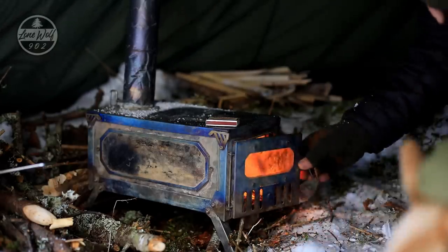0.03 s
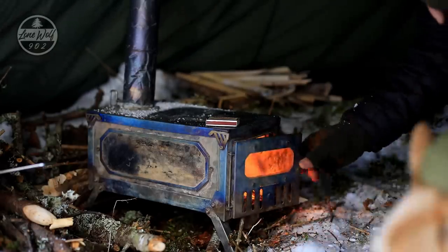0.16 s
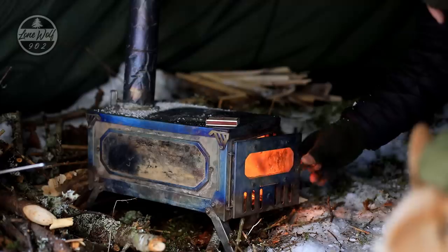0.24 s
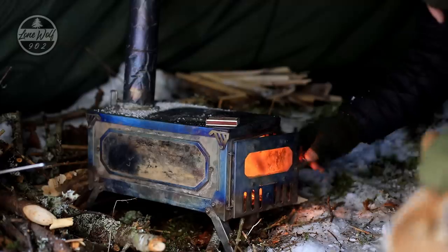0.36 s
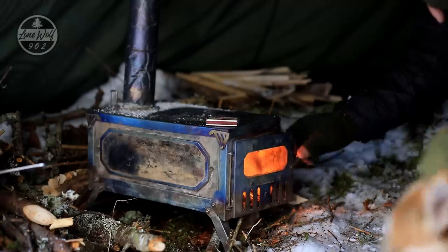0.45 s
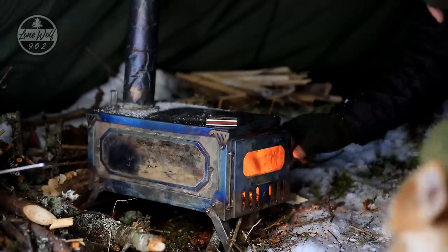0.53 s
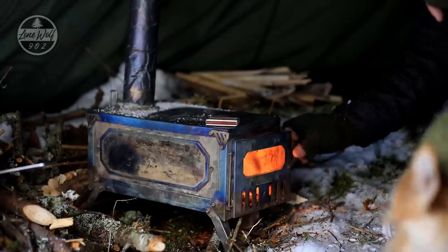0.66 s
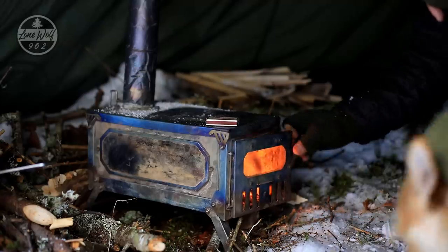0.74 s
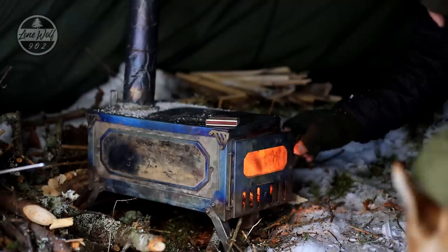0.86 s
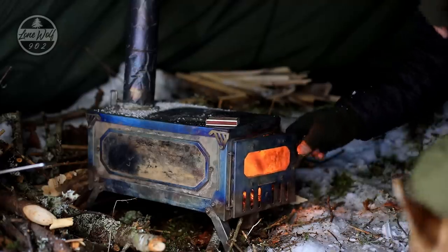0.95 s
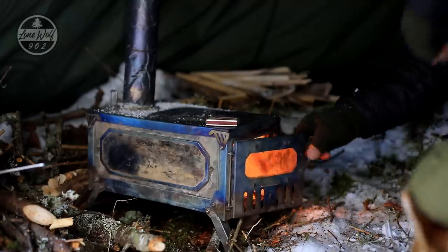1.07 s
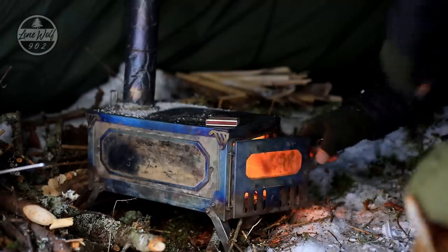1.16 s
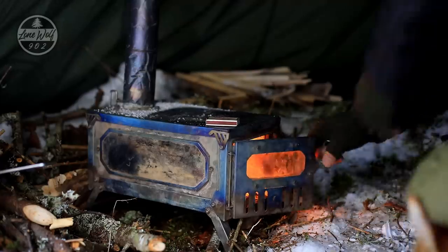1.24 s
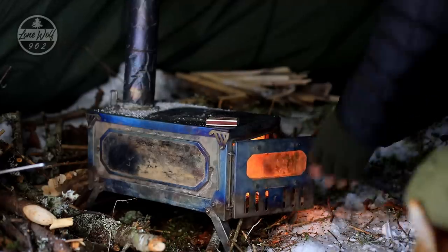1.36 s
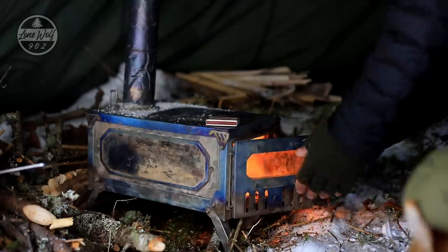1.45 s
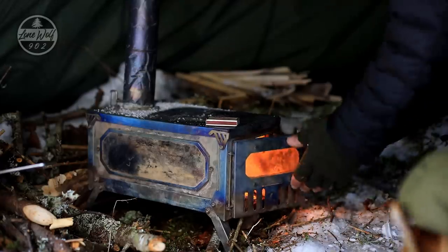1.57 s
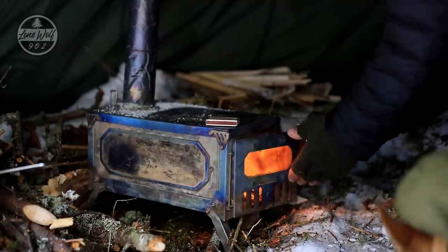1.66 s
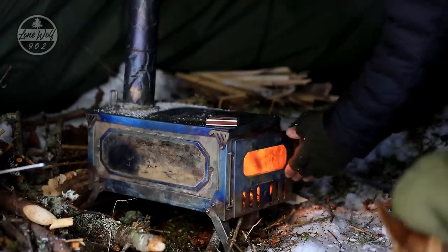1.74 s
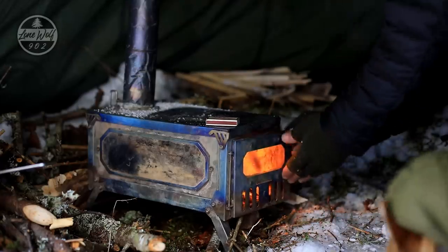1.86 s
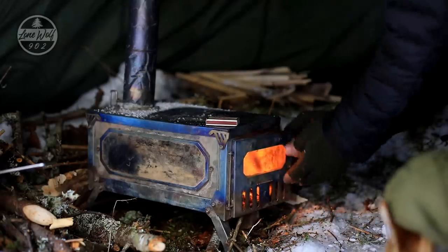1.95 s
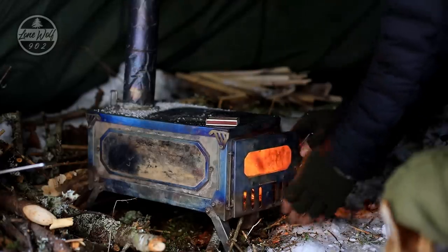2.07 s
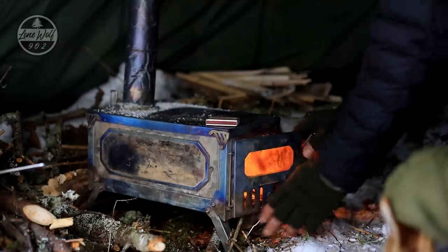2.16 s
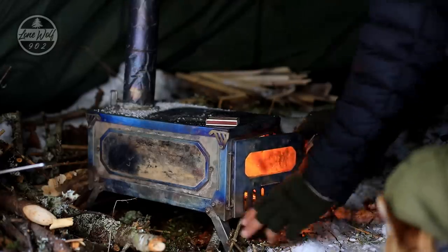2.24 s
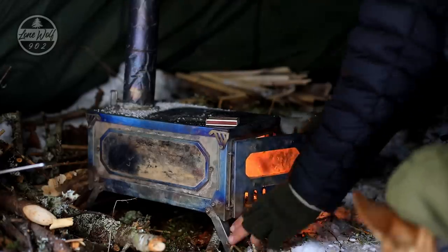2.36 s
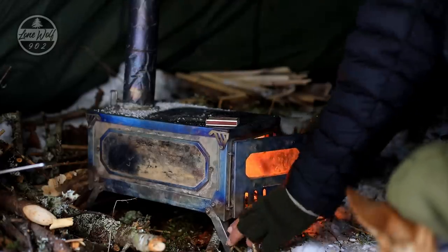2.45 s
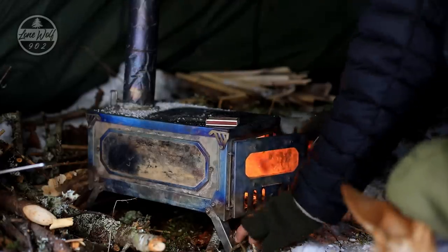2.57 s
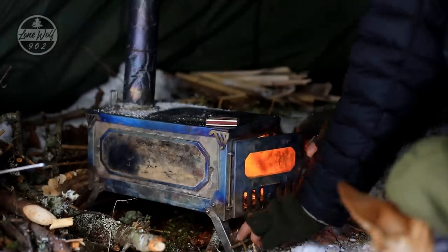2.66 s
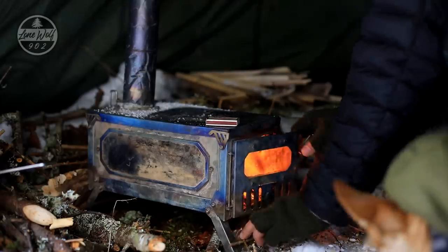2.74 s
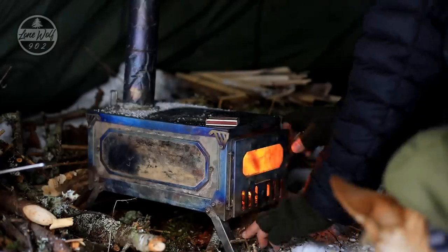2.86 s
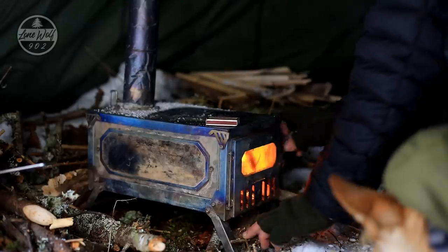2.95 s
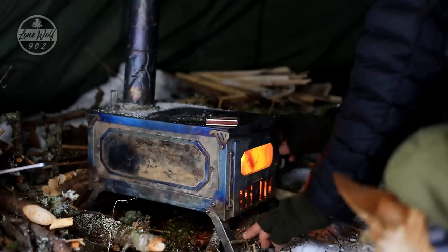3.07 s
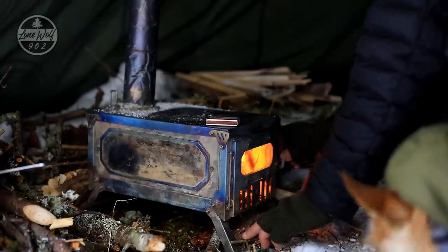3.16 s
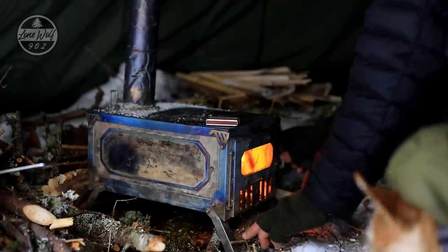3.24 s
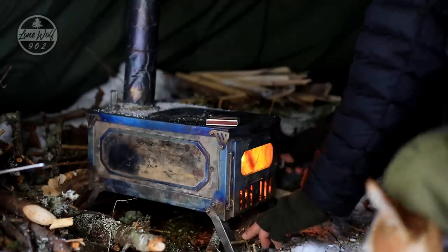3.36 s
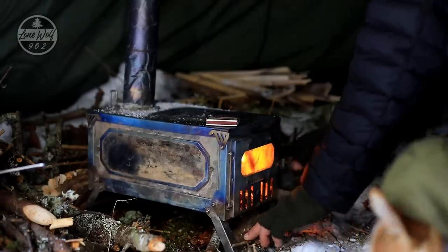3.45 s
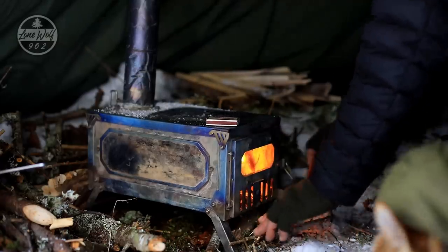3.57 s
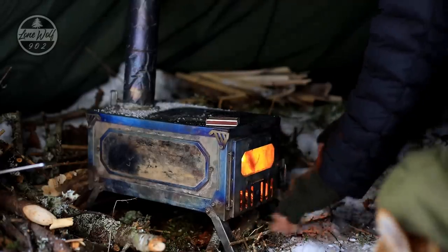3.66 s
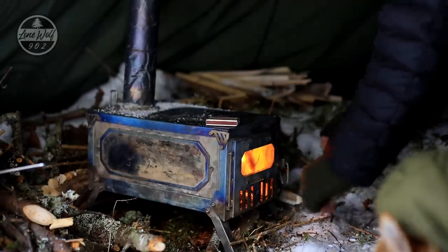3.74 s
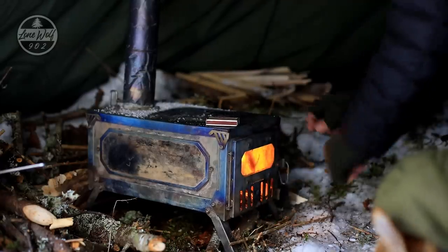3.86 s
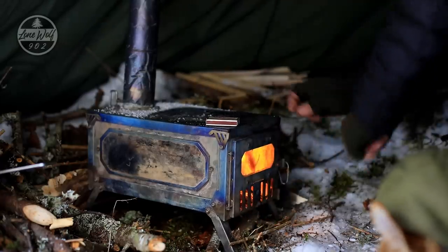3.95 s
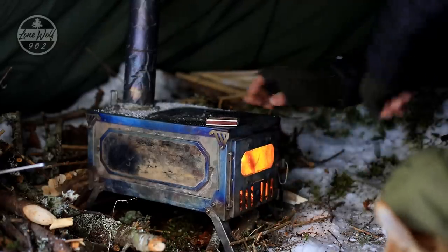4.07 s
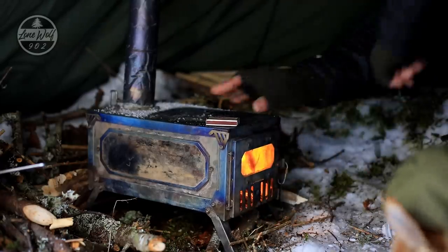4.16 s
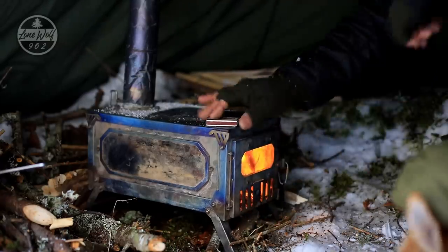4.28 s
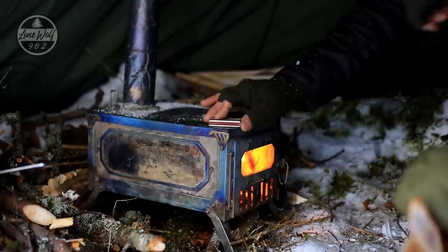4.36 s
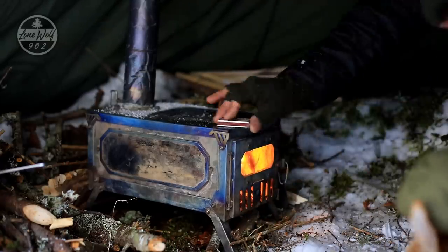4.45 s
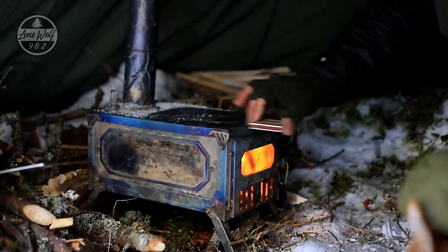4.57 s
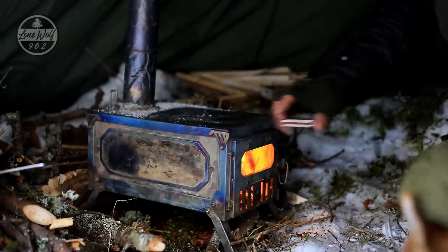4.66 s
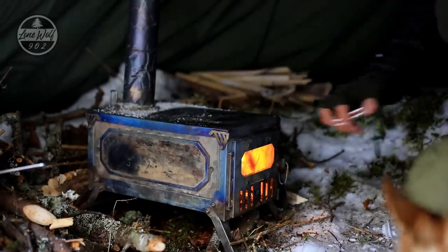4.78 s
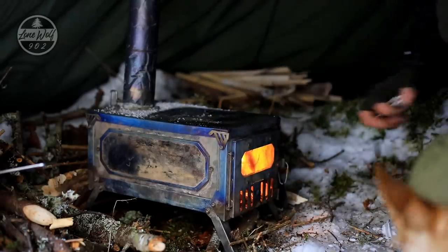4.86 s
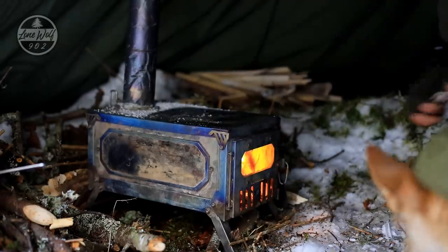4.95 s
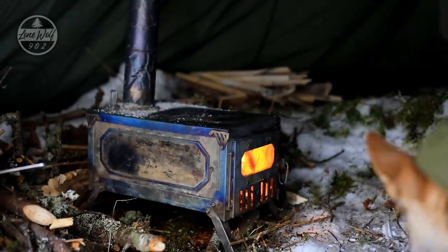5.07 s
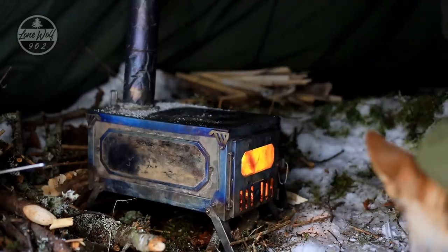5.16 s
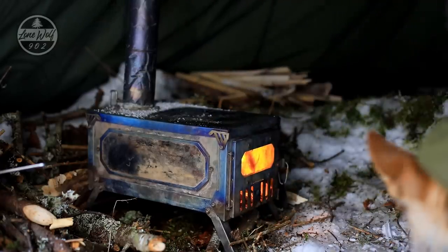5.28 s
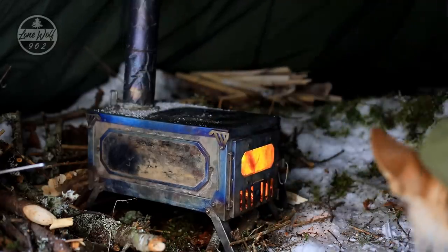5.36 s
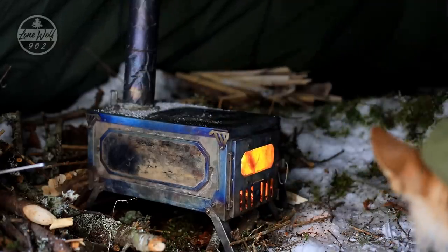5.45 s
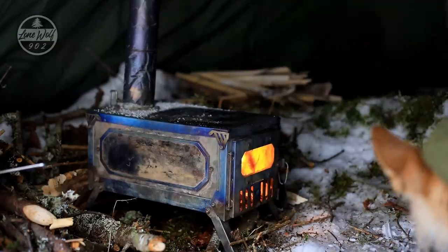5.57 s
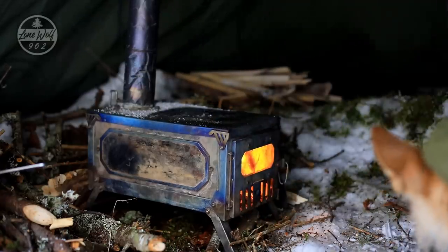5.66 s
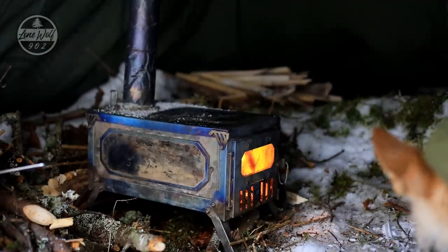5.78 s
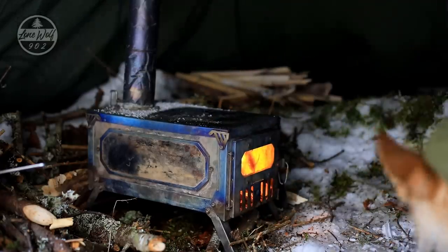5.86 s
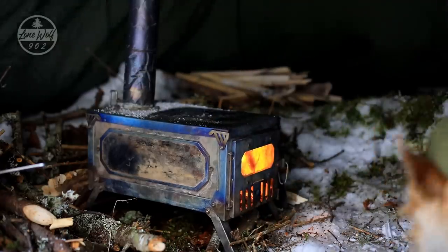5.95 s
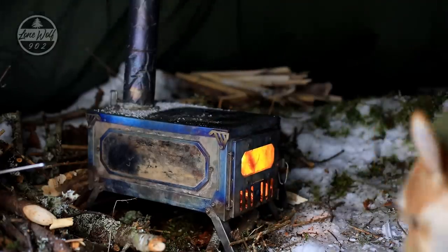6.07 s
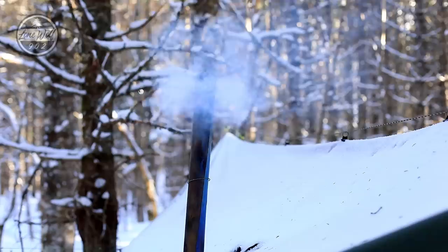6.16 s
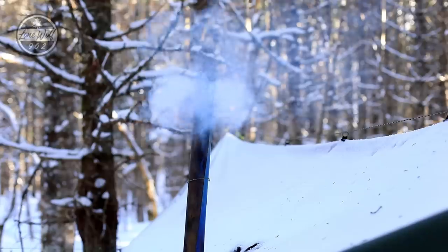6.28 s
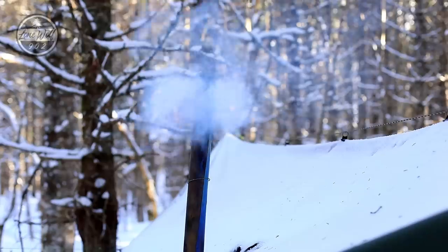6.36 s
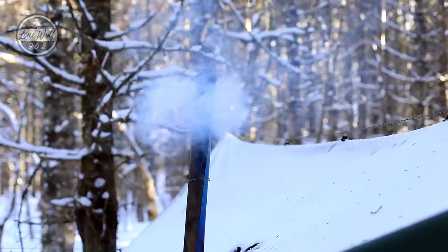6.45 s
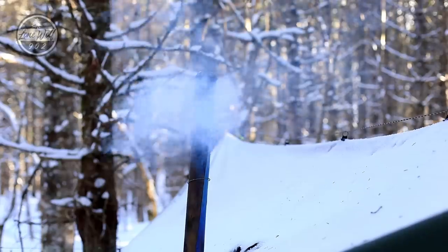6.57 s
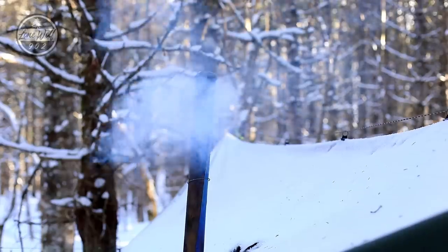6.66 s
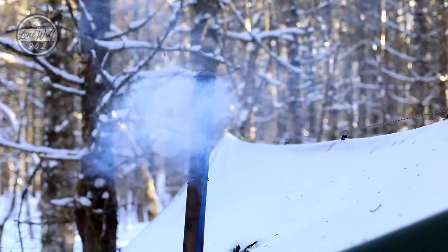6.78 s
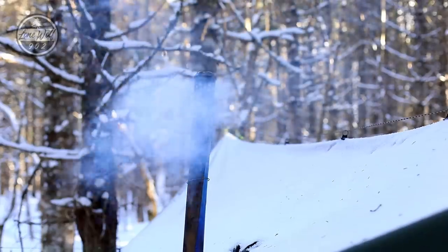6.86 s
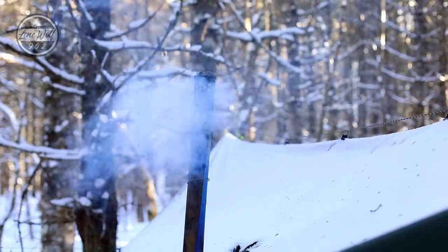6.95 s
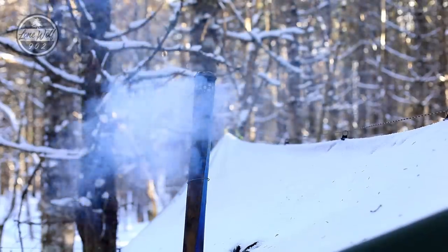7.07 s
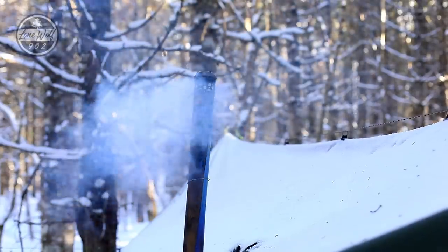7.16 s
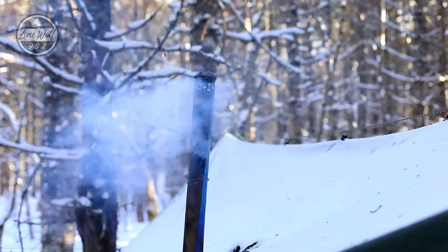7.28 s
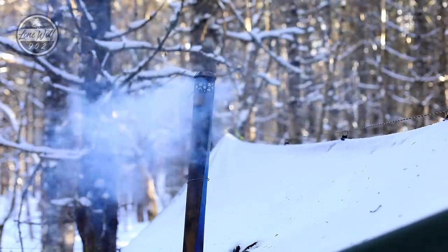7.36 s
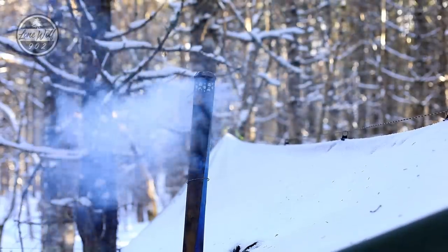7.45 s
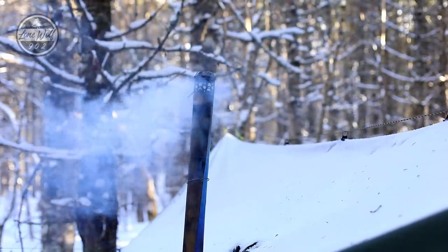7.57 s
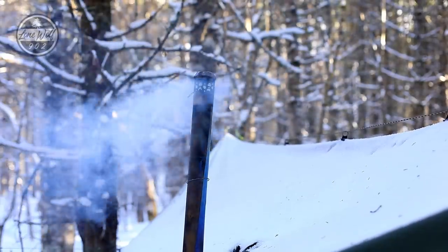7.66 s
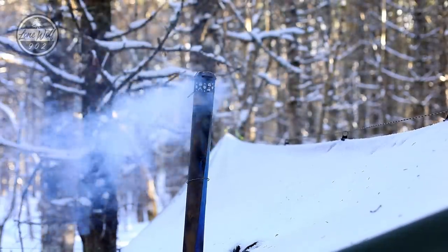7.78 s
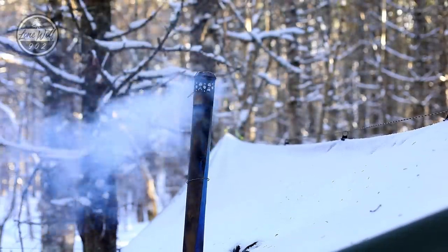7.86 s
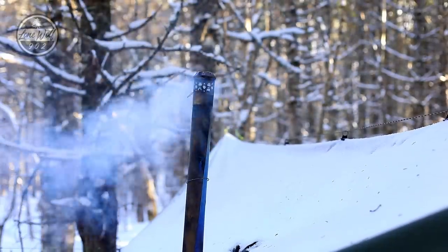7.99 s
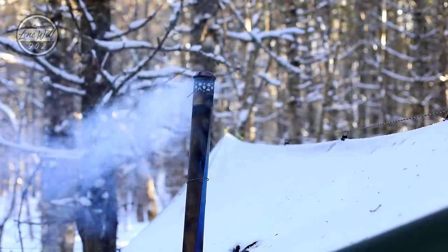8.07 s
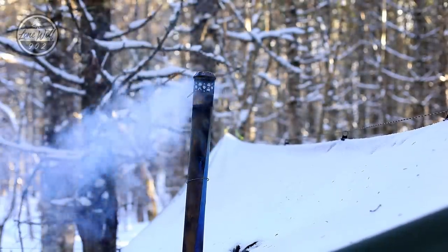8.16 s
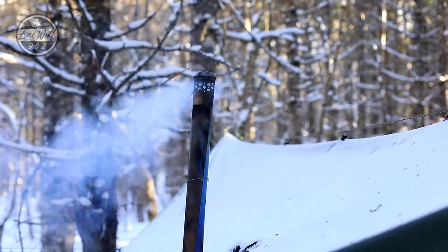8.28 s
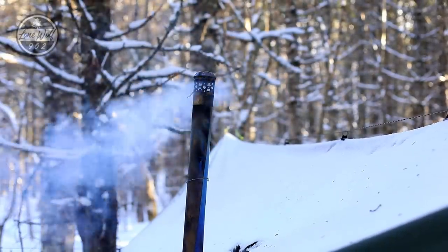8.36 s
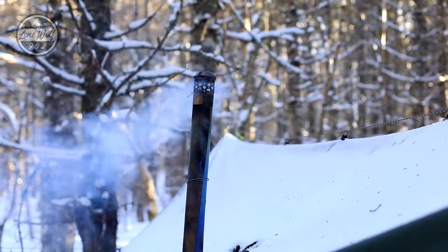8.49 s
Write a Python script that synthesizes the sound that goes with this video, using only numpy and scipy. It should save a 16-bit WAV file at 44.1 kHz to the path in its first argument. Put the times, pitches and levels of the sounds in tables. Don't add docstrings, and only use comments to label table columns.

```python
import sys
import numpy as np
from scipy import signal
from scipy.fft import rfft, irfft
from scipy.io import wavfile
from scipy.ndimage import uniform_filter1d

SR = 44100
rng = np.random.default_rng(int(sys.argv[2]) if len(sys.argv) > 2 else 0)


def wav_out(sig):
    wavfile.write(sys.argv[1], SR, np.round(np.clip(np.atleast_2d(sig).T, -1, 1) * 32767).astype(np.int16))


def invert_db(x):
    u = np.asarray(x, float) / 20
    return 10 ** u


N = 375776

# frequency in Hz, level in dB per Hz.
ROAR_SPECTRUM = [(60, -44), (100, -23), (140, 6), (190, 0), (430, -1), (600, -1), (1000, -1), (1300, -0.5),
                 (1500, 1), (1750, -2.5), (2100, -5.5), (3200, -11.5), (6000, -37)]
# frequency in Hz, level in dB per Hz.
LEAF_SPECTRUM = [(1060, -13), (1800, -4), (2110, -4), (2210, -3), (3530, -3), (4240, -10), (11000, -31.5),
                 (14300, -62), (22000, -120)]
# frequency in Hz, level in dB per Hz.
RUMBLE_SPECTRUM = [(12, -34), (20, -3.5), (49, 5), (130, -1), (148, -15), (194, -14), (200, -26),
                   (260, -45), (440, -120)]
# frequency in Hz, level in dB per Hz.
DRAUGHT_SPECTRUM = [(2500, -38), (3300, -3), (3900, -0.5), (4500, -6.5), (5200, -11.5), (6500, -37)]
# time in seconds, gust strength in dB.
GUSTS = [(0, 4.5), (.66, 0), (1.21, 2), (1.54, -2), (2.28, -1.5), (3.4, -2), (3.89, 1.5), (4.32, 0),
         (4.86, 1), (5.58, 7.5), (6.0, 6.5), (6.38, 6.5), (6.71, 10), (7.31, 5.5), (7.92, 3.5), (8.52, 4)]
ROAR_DB, ROAR_SHARE, LEAVES_DB, LEAVES_SHARE = -40.5, 0.4, -49.5, 0.99
RUMBLE_DB, RUMBLE_SHARE, DRAUGHT_DB, DRAUGHT_SHARE = -49, 0.32, -52.5, 0.064
OUTSIDE_S, STEP_S, OUTSIDE_DB = 6.05, 0.052, -9.5
# start, attack, hold, release in seconds, gain in dB.
PULL = (4.54, 1.13, 0.39, 0.59, 10.2)

# frequency in Hz, level in dB per Hz.
HISS_SPECTRUM = [(3240, -30), (5500, -3), (7920, -7), (15100, -10.5), (16100, -14), (16400, -31)]
HISS_DB = -61.5

LATCH_HZ = [3623, 7639, 7736, 10433, 13604, 14795, 15155]
# level in dB, free t60 in seconds, touched t60 in seconds.
LATCH_MODES = [(0, 0.19, 0.019), (-6, .25, .07), (-3, 0.34, 0.091), (-1.5, 0.22, 0.062), (0, .1, .05),
               (-4, .1, .05), (-1, .06, .04)]
# dB of the 3.6 kHz, 7.7 kHz, 10 kHz and top modes.
FLAT = (1.5, -32, -32, -35)
EDGE = (0, -31, -11, -31)
FULL = (0.5, -20.5, -17.5, -27)
SIDE_ON = (-0.5, -26, -29, -24)
TIP = (-2, -25, 0, -4)
CATCH = (-2, -10, -13, -30)
# time in seconds, blow in dB, seconds until touched.
BAR_HITS = [
    (FLAT, [(.016, -38, .014), (.284, -44, .025), (.075, -44, .03), (.262, -48, .04), (3.6405, -29.5, 0.013), (3.659, -45, 0.02), (3.815, -35, 0.01), (3.827, -27, .005), (3.901, -36, .018)]),
    (EDGE, [(.234, -41, .01), (.295, -43, .008), (3.515, -40, .06)]),
    (FULL, [(0, -26.5, 0.013), (3.8323, -14.5, .033)]),
    (SIDE_ON, [(3.779, -14.5, 0.032), (3.8452, -18.5, 0.021)]),
    (TIP, [(3.646, -51, .012), (3.667, -38.5, 0.022)]),
    (CATCH, [(.545, -48, .015), (3.868, -33, 0.03)]),
]
HANDLE_HZ = [1663, 2080, 2234, 2595, 3278, 4371, 4851, 4908, 5534, 6742, 10977, 11730, 12400]
# level in dB, free t60 in seconds, touched t60 in seconds.
HANDLE_MODES = [(-7, 0.18, .05), (-14, 0.23, 0.074), (-3, 0.092, 0.044), (-3, .1, .05), (-8, .1, .05),
                (-14, .1, .05), (-5, 0.19, .06), (-8, .15, .06), (-9, 0.17, .08), (2, 0.98, .04),
                (-3, 0.29, .06), (-11, .3, .06), (-3, .12, .06)]
# dB of the modes under 4 kHz, under 6 kHz, at 6.7 kHz and above.
SWUNG = (0, -10, -32, -8)
JOLTED = (0, 3, -26, -20)
NUDGED = (-1, -16, -25, -30)
LOOP = (-20, -20, -1, -16)
RIM = (-6, 2, -8, -2)
# time in seconds, blow in dB, seconds until touched.
HANDLE_HITS = [
    (SWUNG, [(3.64, -53, .008), (3.7785, -25.5, .065)]),
    (JOLTED, [(3.8333, -32.5, 0.051)]),
    (NUDGED, [(2.893, -47, .015), (3.85, -39, 0.018), (3.901, -37, .02)]),
    (LOOP, [(.018, -56, .01), (.075, -61, .03), (3.6755, -48, 0.018), (3.78, -39.5, 0.048), (3.8333, -41, .024)]),
    (RIM, [(0, -48, .015), (.27, -62, .02)]),
]

# time in seconds,
# frequency in Hz, level in dB, t60 in seconds.
PINGS = [(.495, 1050, -35, .05), (.5075, 1790, -23, .04), (0.5114, 1930, -22, .05),
         (0.5135, 3360, -23, 0.046), (.5165, 4100, -26, .04), (.524, 3790, -29, .05),
         (.5245, 1410, -28, 0.042), (.535, 3600, -32, .04), (1.024, 2700, -32, .02),
         (1.024, 1900, -31, .02), (1.2875, 2600, -20, .003), (.3615, 8700, -38, .02),
         (.362, 2600, -33, .03), (2.591, 3420, -32, .03), (2.595, 3180, -28, .02), (2.676, 6800, -47, .015),
         (2.8915, 3270, -29, .02), (3.088, 7600, -19, .02), (3.088, 3870, -15, .012),
         (3.0892, 3210, -14, 0.024), (3.092, 524, -32, .1), (3.11, 560, -33, 0.066),
         (3.0915, 1805, -28, 0.079), (3.094, 3770, -25, 0.062), (3.095, 4160, -26, .05),
         (3.096, 894, -32, 0.088), (3.1, 2640, -30, .09), (3.105, 3350, -33, 0.073),
         (3.111, 2280, -34, 0.087), (3.2538, 3620, -22, .012), (3.2553, 2800, -21, .012),
         (3.2692, 4130, -19.5, .012), (3.27, 9900, -44, 0.022), (3.2722, 3400, -32, .04),
         (3.5148, 3940, -30, 0.032), (3.515, 10200, -33, .03), (3.516, 3100, -36, .04),
         (3.5585, 4300, -31, .015), (3.561, 3570, -34, .05), (3.641, 1520, -18, .01),
         (3.641, 3500, -27, .012), (3.6455, 1550, -25, .01), (3.6755, 3500, -29, .02),
         (4.9042, 1700, -22, .012), (4.9085, 5300, -39, .05), (4.9135, 1800, -20, .012),
         (4.9345, 3620, -25, .025), (5.124, 513, -32, 0.065),
         (.0425, 8600, -48, .012), (.0425, 10300, -51, .012), (.361, 9850, -40, .02),
           (.515, 6400, -30, .025), (.5365, 3300, -30, .02), (3.0882, 4900, -21, .025),
           (3.0882, 5600, -32, .025), (3.0884, 6500, -24, .025), (3.0905, 2675, -24, .04),
           (3.106, 3380, -27, 0.027), (3.7788, 5600, -25, .03), (3.7792, 4900, -26, .03),
           (3.781, 1670, -28.5, .05), (3.8318, 5000, -24, .02), (3.834, 2190, -26, .03),
           (3.783, 5300, -30, .03), (3.836, 4600, -32, .04), (3.866, 5200, -36, .03),
           (3.865, 2100, -31, 0.013), (3.902, 3100, -32, .04), (3.907, 3900, -34, .04),
           (3.912, 2900, -34, .03), (4.9183, 1800, -27, .01), (4.925, 1900, -29, .015),
           (4.936, 1850, -24, .01), (4.9455, 1900, -32, .015), (4.957, 3500, -36, .03),
           (2.596, 14000, -42, .02), (2.597, 12500, -43, .025), (2.599, 8000, -40, .025),
           (2.598, 7000, -41, .03), (2.934, 11500, -50, .008), (2.934, 14000, -51, .008),
           (3.514, 13000, -36, .015), (3.514, 14900, -40, .015), (3.525, 15000, -44, .025),
           (3.5145, 10900, -39, .04), (3.536, 3630, -36, .05), (3.575, 6000, -39, .015),
           (3.667, 15000, -38, .03), (3.6765, 3600, -31, .012), (3.684, 1500, -35, .05),
           (1.135, 3200, -26, .004), (1.288, 4500, -27, .004)]
# time in seconds, frequency in Hz, level in dB, seconds until caught.
RINGS = [(0, 12400, -54, .035), (0, 15155, -54, .015), (.263, 6780, -54, .045), (.263, 14800, -59, .025),
         (.27, 11730, -63, .02), (2.865, 3710, -39, .006), (2.866, 3410, -41, .014),
         (2.873, 3710, -39, .007), (2.882, 3720, -42, .006), (2.89, 1750, -41, .012),
         (2.8975, 3300, -36, .0073), (3.6495, 7700, -46, .011), (3.7795, 7728, -35, .043),
         (3.7795, 4387, -34, .02), (3.78, 3100, -34, .02), (3.834, 5534, -41, .035),
         (3.855, 2110, -31, .012), (3.868, 3850, -38, .02), (3.906, 2095, -37, .011),
         (4.943, 1900, -36, .012), (4.933, 3600, -41, .03)]
PING_RISE_S, RING_T60_S, CAUGHT_T60_S = 0.00096, 0.25, 0.015

# frequency in Hz, level in dB per Hz.
SHEET_SPECTRUM = [(290, -37), (500, 2), (919, -13), (1190, -5), (1870, -5), (2850, -9), (3340, -3),
                  (6510, -12), (7100, -15.5), (9630, -16.5), (16000, -26)]
# lowest ringing frequency in Hz, tilt in dB per octave, rub in seconds.
SPECK = (8200, 2, 0.0033)
SCRAPE = (570, -1.5, 0.01)
SNAP = (2450, -0.5, 0.0012)
TAP = (2400, -4, 0.0015)
SLAP = (1560, 0.9, 0.0046)
PLASTIC = (1780, -12, 0.0052)
SLAM = (2700, -0.45, 0.0025)
# time in seconds, blow in dB, t60 in seconds.
SPECKS = [(.043, -51, .008), (.345, -60, .02), (.583, -54, .02), (.885, -59, .02), (1.767, -60, .02),
          (2.232, -54, .03), (2.29, -57, .04), (2.315, -58, .02), (2.47, -57, .06), (2.574, -66, .03),
          (2.676, -57, .015), (2.657, -52, 0.05), (3.527, -54, 0.026), (2.692, -63, .02),
          (2.934, -58, .015)]
# time in seconds, blow in dB, t60 in seconds.
SCRAPES = [(.46, -47, .05), (0.469, -36.5, 0.1), (.4945, -33, 0.083), (.503, -27, 0.054), (.526, -34, 0.08),
           (3.091, -28.5, 0.11), (4.43, -42, .04), (5.112, -50, .04)]
# time in seconds, blow in dB, t60 in seconds.
SNAPS = [(.26, -41, 0.066), (.295, -43, .04), (.362, -36.5, .04), (2.596, -38, 0.13), (3.5142, -33, 0.14),
         (3.6595, -34.5, 0.096)]
# time in seconds, blow in dB, t60 in seconds.
TAPS = [(1.813, -41, .03), (2.376, -54, .03), (2.59, -37, 0.037), (2.891, -43.5, .1), (3.071, -35.5, 0.068),
        (3.0875, -22.5, 0.014), (3.2545, -37.5, 0.06), (3.2698, -35.5, 0.086), (3.526, -50, .08),
        (3.558, -35, 0.082), (3.575, -37, .06), (2.676, -38.5, 0.054), (3.676, -39, .07),
        (4.764, -45, 0.033)]
# time in seconds, blow in dB, t60 in seconds.
SLAPS = [(.512, -27, 0.11), (3.7787, -24.5, .06), (3.797, -37, .06), (3.81, -37, .06), (3.8318, -29, 0.075),
         (3.853, -34, .07), (3.866, -35, 0.087), (3.901, -36, 0.11)]
# time in seconds, blow in dB, t60 in seconds.
KNUCKLES = [(3.64, -39, 0.015), (4.368, -30.5, .03), (4.908, -35, .08), (4.918, -39, 0.078),
            (4.935, -39, 0.086)]
# time in seconds, blow in dB, t60 in seconds.
SLAMS = [
    (3.088, -23.5, 0.055),
]
# time in seconds, blow in dB, t60
# in seconds.
QUICK_SPECKS = [(4.909, -55, .02), (4.914, -51, .02), (4.919, -52, .02), (4.924, -52, .012), (4.941, -58, .015)]

# frequency in Hz, level in dB, t60 in seconds.
HINGE_MODES = [(3420, -31, 0.11), (3537, -22, 5.0), (3910, -3, 0.05), (4700, -23, 0.85), (6100, -2, 0.039),
               (6570, -2, 0.11), (8170, -9, 0.043), (9070, -9.5, 0.093), (9500, -5, 0.029),
               (11400, -4.5, 0.048), (13670, -17, 0.042), (13980, -23, 0.076)]
# time in seconds, dB of the modes under 5 kHz, under 8 kHz, under 11 kHz and above.
TICKS = [(.262, -60, -43, -52, -65), (.361, -45, -45, -44, -55), (2.376, -65, -53, -65, -65),
         (2.595, -32, -35, -29, -36), (3.0882, -36, -35, -23.5, -30), (3.2715, -42, -55, -50, -60),
         (3.5145, -40, -40, -35, -38), (.513, -36, -28, -29, -42)]
# frequency in Hz, level in dB, t60 in seconds.
LIGHTER_MODES = [(1010, -2, 0.05), (1850, -1, 0.012)]
# time in seconds, dB of the modes under 1.3 kHz and above.
KNOCKS = [(4.369, -25, -19), (4.9403, -45, -15)]

# frequency in Hz, level in dB, t60 in seconds.
BOX_MODES = [(47.5, -27, 0.93), (181, -52, 0.11), (216, 0, 0.056), (267.6, 5.5, 0.035), (381, -16, 0.1),
             (890, -14.5, 0.068), (1120, -14.5, 0.056)]
# time in seconds, push in dB, tilt in dB per octave.
THUMPS = [(0.468, -23.5, -6.5), (0.4984, -25, -1), (.501, -28, -3), (0.5055, -25, -4), (0.5099, -19, -1),
          (.519, -29, -2), (.526, -30, -2), (0.546, -43, 1), (0.939, -45, 7), (1.01, -35, 3),
          (1.785, -33, 0), (2.698, -29.5, -5), (3.071, -32, 10), (3.085, -19, 1), (3.0892, -13.5, 0.5),
          (3.0985, -30, -6.5), (3.117, -30, -10), (3.124, -28, -4), (3.14, -38, -9.5), (3.5503, -23.5, 6),
          (3.783, -38.5, 17), (5.108, -32.5, 9), (5.129, -34, 7), (5.306, -40, 19), (7.92, -43, -11)]

# time in seconds, peak in dB.
CRACKS = [(.5155, -14), (2.5976, -19), (3.0878, -4), (3.2695, -32), (3.559, -30), (3.6415, -40),
          (3.66, -30), (4.3685, -23), (4.9138, -27)]
CRACK_HZ, CRACK_T60_S = 5600, 0.0012

# frequency in Hz, level in dB per Hz.
NYLON_SPECTRUM = [(1180, -13), (2000, -4), (3540, 1), (3970, -2.5), (4300, -1.5), (5850, -5), (11300, -8.5),
                  (15750, -17.5), (16400, -36)]
# start, attack, hold and release in seconds, level in dB.
SWISHES = [(0.883, 0.064, 0.14, 0.3, -59), (1.104, 0.12, .02, 0.17, -58), (0.928, 0.1, 0.47, 0.27, -51.5),
           (2.198, 0.087, .06, .06, -63), (3.878, 0.046, 0.22, 0.58, -55), (4.224, 0.19, 0.17, .06, -50),
           (4.267, 0.061, 0.066, .05, -64), (4.56, .02, 0.05, 0.015, -58), (4.6, 0.03, 0.27, 0.038, -66),
           (4.885, .025, 0.016, 0.02, -53), (4.93, .01, 0.035, .08, -56), (5.085, .035, 0.15, 0.27, -59)]
REST_DB = -21
DULL_HZ, DULL_LEAD_S, DULL_BLUR_S = 6500, 0.045, 0.04
# start, attack, hold, release in seconds, level in dB.
FOLD = (1.0, 0.08, 0.2, 0.07, -52)
FOLD_FROM_HZ, FOLD_OCTAVES_PER_S, FOLD_WIDTH_HZ = 2500, 3.25, 360

# time in seconds, low edge in Hz, high edge in Hz, level in dB.
FLECKS = [(1.1639, 5680, 6890, -54), (1.1639, 11710, 13780, -57), (1.3264, 14470, 15850, -62),
          (1.3961, 6890, 8270, -55), (1.3961, 12400, 14470, -61), (2.441, 4650, 5680, -65),
          (2.9982, 6200, 7580, -70), (4.0896, 8960, 10340, -60), (4.0896, 13780, 15160, -69),
          (4.2057, 6890, 8960, -63), (4.5075, 6890, 8270, -55), (4.5075, 8960, 10340, -57),
          (4.8094, 4200, 5170, -56), (6.1561, 4200, 5170, -49), (6.1561, 8270, 9650, -69),
          (6.2722, 4200, 5170, -54), (6.2722, 8270, 9650, -70), (8.0834, 4200, 5680, -55)]


def evened(x):
    return x / np.sqrt(np.mean(x ** 2) + 1e-20)


def add(mix, s, sound):
    part = mix[max(round(s * SR), 0):][:len(sound)]
    part += sound[:len(part)]


def stroke(start_s, attack_s, hold_s, release_s):
    corners_s = np.cumsum([start_s, attack_s, hold_s, release_s])
    return np.interp(np.arange(N) / SR, corners_s, [0, 1, 1, 0])


def noise(spectrum, patchy_db, size=1024):
    frames, hz = 4 * N // size + 5, np.fft.rfftfreq(size, 1 / SR)
    real, imag, patches = rng.standard_normal((frames, len(hz), 3)).T
    patches = uniform_filter1d(patches, size=12, axis=0)
    patches = evened(uniform_filter1d(patches, size=14, axis=1))
    f, db = np.transpose(spectrum)
    colour_db = np.interp(np.log(hz + 1), np.log(f + 1), db, left=-90, right=-90)
    z = (real + 1j * imag) * invert_db(colour_db[:, None] + patchy_db * patches)
    return evened(signal.istft(z, nperseg=size, noverlap=size * 3 // 4)[1][:N])


def steel(modes_hz, modes, edges_hz, strikes):
    out, t, hz = np.zeros(N), np.arange(SR // 4) / SR, np.array(modes_hz)[:, None]
    db, free_t60, held_t60 = np.transpose(modes)[:, :, None]
    group = np.searchsorted(edges_hz, hz)
    rise = 1 - np.exp(-t / 0.00036)
    for s, *group_db, free_s in strikes:
        free_loss = np.minimum(t, free_s) / free_t60
        held_loss = np.maximum(t - free_s, 0) / held_t60
        level_db = db + np.array(group_db)[group] - 60 * (free_loss + held_loss)
        ringing = invert_db(level_db) * np.sin(2 * np.pi * hz * t)
        add(out, s, ringing.sum(axis=0) * rise)
    return out


def spotted(groups):
    return [(s, *(db + np.array(spot)), free_s) for spot, rows in groups for s, db, free_s in rows]


def clamped(modes, edges_hz, strikes):
    hz, db, t60 = np.transpose(modes)
    t60 = np.clip(t60, 0.01, 0.07)
    return steel(hz, np.transpose([db, t60, t60]), edges_hz, [(*row, 0) for row in strikes])


def wind():
    gust_db = np.interp(np.arange(N) / SR, *np.transpose(GUSTS))
    *pull, pull_db = PULL
    outside_db = OUTSIDE_DB * stroke(OUTSIDE_S, STEP_S, N, 1)
    roar_db = ROAR_DB + ROAR_SHARE * gust_db
    leaves_db = LEAVES_DB + LEAVES_SHARE * gust_db
    rumble_db = RUMBLE_DB + RUMBLE_SHARE * gust_db + outside_db
    draught_db = DRAUGHT_DB + DRAUGHT_SHARE * gust_db + pull_db * stroke(*pull)
    roar = invert_db(roar_db) * noise(ROAR_SPECTRUM, 0.33)
    leaves = invert_db(leaves_db) * noise(LEAF_SPECTRUM, 0.85)
    rumble = invert_db(rumble_db) * noise(RUMBLE_SPECTRUM, 2.5, size=4096)
    draught = invert_db(draught_db) * noise(DRAUGHT_SPECTRUM, 0.49)
    return roar + leaves + rumble + draught


def microphone_hiss():
    return invert_db(HISS_DB) * noise(HISS_SPECTRUM, 0.6)


def latch():
    bar = steel(LATCH_HZ, LATCH_MODES, [6000, 9000, 12000], spotted(BAR_HITS))
    handle = steel(HANDLE_HZ, HANDLE_MODES, [4000, 6000, 9000], spotted(HANDLE_HITS))
    return bar + handle


def pings():
    out, t = np.zeros(N), np.arange(5000) / SR
    rise = 1 - np.exp(-t / PING_RISE_S)
    rows = [(*row, 1) for row in PINGS]
    rows += [(s, hz, db, RING_T60_S, free_s) for s, hz, db, free_s in RINGS]
    for s, hz, db, t60, free_s in rows:
        lost_db = 60 * (t / t60 + np.maximum(t - free_s, 0) / CAUGHT_T60_S)
        add(out, s, invert_db(db - lost_db) * np.sin(2 * np.pi * hz * t) * rise)
    return out


def sheet_contact(blow_db, t60, low_hz, tilt_db, rub_s):
    t = np.arange(6000) / SR
    hz, frames_s, z = signal.stft(rng.standard_normal(len(t)), SR, nperseg=128, noverlap=112)
    hz = hz[:, None]
    f, db = np.transpose(SHEET_SPECTRUM)
    octaves = np.log2((hz + 50) / low_hz)
    colour_db = tilt_db * np.maximum(octaves, 0) + 18 * np.minimum(octaves, 0)
    colour_db = colour_db + np.interp(np.log(hz + 1), np.log(f), db, right=-60)
    life_s = t60 * np.clip(hz / 4000, 0.3, 4) ** -0.5
    lost_db = 60 * np.maximum(frames_s - rub_s, 0) / life_s
    wash = signal.istft(z * invert_db(colour_db - lost_db), SR, nperseg=128, noverlap=112)[1]
    rise = np.minimum(t / (0.043 * rub_s + 1e-4), 1)
    return invert_db(blow_db) * rise * wash[:len(t)] / np.std(wash[:round((rub_s + 0.002) * SR)])


def door():
    out = np.zeros(N)
    kinds = [(SLAM, SLAMS), (SPECK, SPECKS), (SCRAPE, SCRAPES), (SNAP, SNAPS), (TAP, TAPS),
             (SLAP, SLAPS), (PLASTIC, KNUCKLES), (SPECK, QUICK_SPECKS)]
    for kind, rows in kinds:
        for s, blow_db, t60 in rows:
            add(out, s, sheet_contact(blow_db, t60, *kind))
    return out


def hinge():
    return clamped(HINGE_MODES, [5000, 8000, 11000], TICKS)


def firebox():
    out, t = np.zeros(N), np.arange(SR // 3) / SR
    hz, db, t60 = np.transpose(BOX_MODES)[:, :, None]
    octaves = np.log2(np.minimum(hz, 400) / 205)
    push = np.sin(np.pi / 2 * np.minimum(t / 0.005, 1)) ** 2
    for s, push_db, tilt_db in THUMPS:
        level_db = db + push_db + tilt_db * octaves - 60 * t / t60
        modes = invert_db(level_db) * np.sin(2 * np.pi * hz * t)
        add(out, s, modes.sum(axis=0) * push)
    return out


def cracks():
    out, t = np.zeros(N), np.arange(200) / SR
    for s, db in CRACKS:
        add(out, s, invert_db(db - 60 * t / CRACK_T60_S) * np.sin(2 * np.pi * CRACK_HZ * t))
    return out


def sleeves():
    level = np.zeros(N)
    for *shape, db in SWISHES:
        level += invert_db(db) * (invert_db(REST_DB * (1 - stroke(*shape))) - invert_db(REST_DB))
    ahead = uniform_filter1d(np.roll(level, -round(DULL_LEAD_S * SR)), round(DULL_BLUR_S * SR))
    catching = evened(uniform_filter1d(rng.standard_normal(N), size=250))
    weave = noise(NYLON_SPECTRUM, 0.6, size=512)
    dull = signal.sosfiltfilt(signal.butter(2, DULL_HZ, fs=SR, output="sos"), weave)
    rubbing = level * dull + np.minimum(level, ahead) * (weave - dull)
    return invert_db(9.5) * invert_db(0.79 * catching) * rubbing


def fold():
    *shape, db = FOLD
    t = np.clip(np.arange(N) / SR - shape[0], 0, 0.5)
    hz = FOLD_FROM_HZ * 2 ** (FOLD_OCTAVES_PER_S * t)
    turn = np.exp(2j * np.pi * np.cumsum(hz) / SR)
    lowpass = signal.butter(2, FOLD_WIDTH_HZ / 2, fs=SR, output="sos")
    fuzz = signal.sosfilt(lowpass, rng.standard_normal((2, N)))
    return invert_db(db) * stroke(*shape) * evened(fuzz[0] * turn.real + fuzz[1] * turn.imag)


def flecks():
    size = 1600
    out, hz = np.zeros(N), np.fft.rfftfreq(size, 1 / SR)
    for s, low_hz, high_hz, db in FLECKS:
        band = rfft(rng.standard_normal(size)) * (hz > low_hz) * (hz < high_hz)
        add(out, s - size / 2 / SR, invert_db(db + 2.5) * np.hanning(size) * evened(irfft(band)))
    return out


def lighter():
    return clamped(LIGHTER_MODES, [1300], KNOCKS)


def scene():
    air = wind() + microphone_hiss()
    stove = latch() + pings() + door() + hinge() + firebox() + cracks()
    mono = air + stove + sleeves() + fold() + lighter()
    return np.array([mono, mono])


def low_pass(x):
    return signal.sosfilt(signal.butter(12, 15850, fs=SR, output="sos"), x)


def record(dry):
    white = invert_db(-76.5) * rng.standard_normal(N)
    bass = invert_db(-83) * noise(RUMBLE_SPECTRUM, 1.5)
    unlike = white + bass + flecks()
    return low_pass(dry + unlike * [[1], [-1]])


dry = scene()
out = record(dry)
wav_out(out)
```